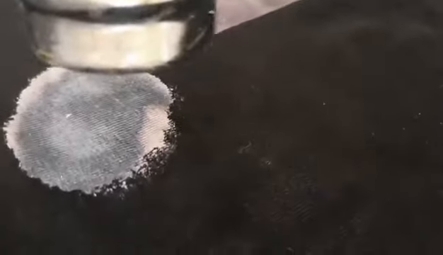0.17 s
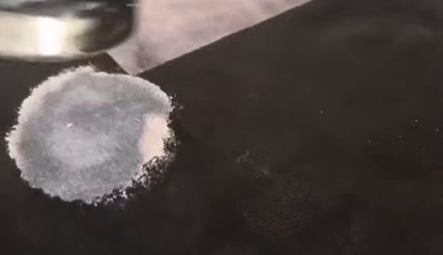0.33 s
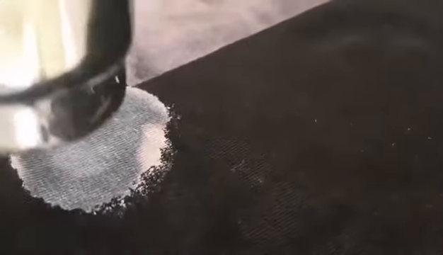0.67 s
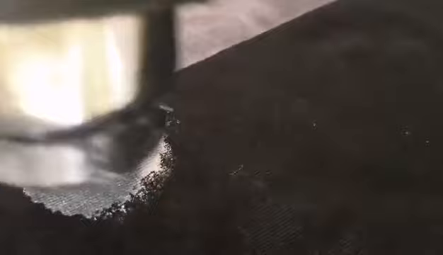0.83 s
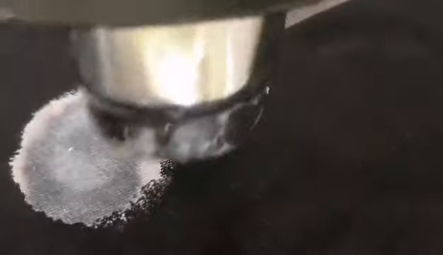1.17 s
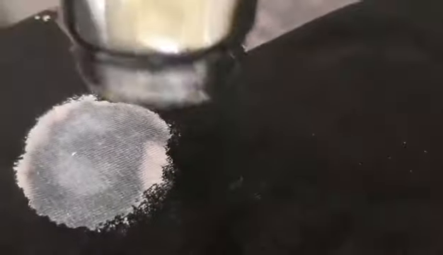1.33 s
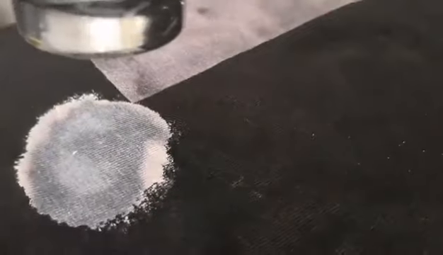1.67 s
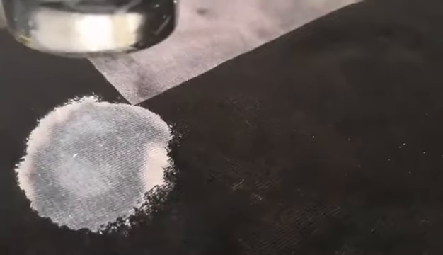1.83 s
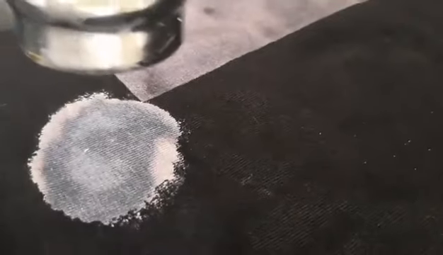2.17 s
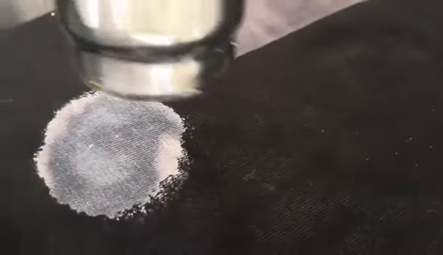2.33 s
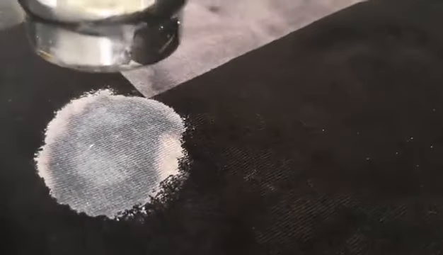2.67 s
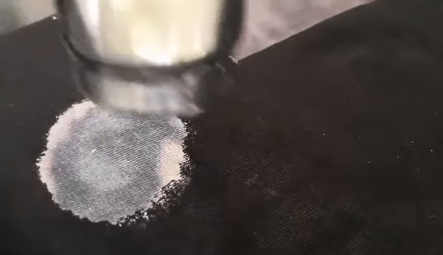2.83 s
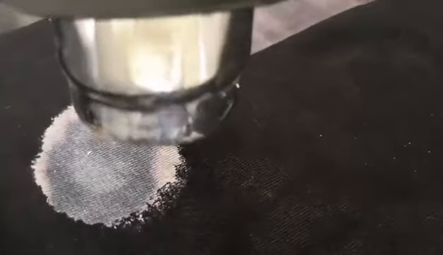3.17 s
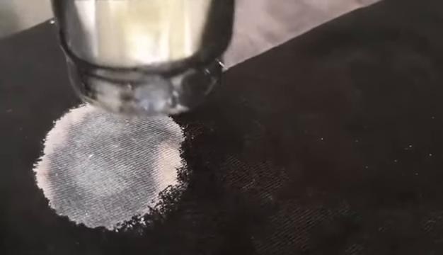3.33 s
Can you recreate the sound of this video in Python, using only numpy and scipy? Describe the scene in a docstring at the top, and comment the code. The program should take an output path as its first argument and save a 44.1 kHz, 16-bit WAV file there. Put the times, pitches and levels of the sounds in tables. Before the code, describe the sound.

A hot-air gun blows steadily close to the microphone, a high fan whine running through the rushing air. The rush shifts gently in colour as the gun sweeps over cloth, and a few soft gusts brush the microphone.

```python
"""A steady rush of air with a fan's whine in it: a hot-air gun, close to a two-port microphone.
A hand sweeps it over a patch on black cloth. The air rushes through the resonances of housing and
nozzle, its colour following the nozzle's position, and the work surface returns a faint reflection.
The fan whines on multiples of the shaft rate. Underneath lie a faint mains hum and the low rumble
of stray air, with short gusts where the jet brushes the microphone."""
import sys
import numpy as np
from scipy import signal
from scipy.fft import rfft, irfft
from scipy.io import wavfile
from scipy.ndimage import uniform_filter1d, map_coordinates

SR = 44100
rng = np.random.default_rng(int(sys.argv[2]) if len(sys.argv) > 2 else 0)


def wav_record(signal):
    """Record a signal, one row per channel, as 16-bit PCM in the file named by sys.argv[1]."""
    frames = np.transpose(np.atleast_2d(signal))
    bounded = np.clip(frames, -1, 1)
    # unit amplitude maps onto the largest positive 16-bit level
    quanta = np.round(bounded * 32767).astype(np.int16)
    wavfile.write(sys.argv[1], SR, quanta)


N = 154350  # 3.5 s

# Gusts of stray air on the microphone: peak_s, centre_hz, level_db
GUSTS = [(.75, 236, -46), (.81, 65, -55), (1.335, 74, -45.5), (1.645, 60.7, -57), (1.965, 50.3, -50),
         (2.045, 55.7, -58), (2.755, 54, -57), (3.474, 190, -42.5)]
# Motor speed: time_s, shaft_hz
SHAFT_SPEED = [(0, 274.8), (.62, 275.3), (1.15, 274.5), (1.36, 272.8), (1.8, 273.5), (2.42, 274.6),
               (3.1, 274.2), (3.5, 273.5)]
# Fan and motor tones at the microphone: shaft_multiple, left_db, right_db, left_lead_rad
FAN_TONES = [(1, -55.5, -56.5, -1.4), (4, -47.5, -55, 0.5), (5, -42, -45.5, -0.6), (6, -62, -56, -1),
             (12, -38.2, -39.7, -1.1), (20, -60, -60, 1.5)]
# The hand's path: time_s, sideways (about -1 left to 1 right), reach (about -1 back to 1 forward)
HAND_SWEEP = [(0.0, -0.61, 0.14), (0.25, -1.18, -1), (0.5, -1.27, 0.13), (0.75, -0.98, 0.53),
              (1.0, -0.099, 0.75), (1.25, 0.36, -0.72), (1.55, -0.18, -1.07), (1.9, -0.27, -1.26),
              (2.1, 0.52, 0.65), (2.4, 0.26, -0.99), (2.75, 0.0009, 0.55), (3.0, 0.13, 0.091),
              (3.25, 0.36, -0.045), (3.5, 0.69, 0.44)]
# Base spectrum of the rush at the two ports: freq_hz, left_db, right_db
RUSH_SPECTRUM = [(22.0, -79.1, -79.2), (237.0, -70.0, -70.1), (366.0, -71.2, -72.0), (495.0, -65.8, -68.3),
                 (690.0, -59.8, -66.3), (790.0, -61.0, -66.0), (875.0, -64.0, -64.8), (947.0, -57.4, -70.2),
                 (1012.0, -56.3, -68.6), (1098.0, -54.7, -62.6), (1184.0, -57.8, -69.8),
                 (1270.0, -59.0, -63.3), (1421.0, -60.1, -67.9), (1464.0, -57.4, -62.4),
                 (1507.0, -57.9, -67.3), (1593.0, -60.4, -68.0), (1723.0, -60.8, -63.2),
                 (1895.0, -53.0, -54.4), (2024.0, -56.5, -63.2), (2110.0, -53.8, -59.3),
                 (2283.0, -59.2, -58.7), (2670.0, -56.6, -59.6), (2756.0, -59.0, -58.3),
                 (2972.0, -59.7, -62.4), (3553.0, -63.0, -66.5), (3639.0, -59.8, -65.0),
                 (3941.0, -61.4, -64.0), (4199.0, -65.4, -74.8), (4414.0, -62.7, -79.9),
                 (4630.0, -64.0, -78.2), (4845.0, -67.9, -81.2), (5362.0, -68.1, -78.9),
                 (5685.0, -67.1, -74.7), (5986.0, -68.9, -74.8), (7429.0, -69.7, -73.0)]
# Narrow resonances of the housing: centre_hz, width_hz, lift_db
HOUSING_RESONANCES = [(738, 14, 8), (1272, 25, 1.5), (1467, 20, 1.5), (2005, 14, 2)]
# How alike the two ports hear the rush: freq_hz, coherence (0-1), left_lead_rad
PORT_LIKENESS = [(22.0, 0.97, -0.02), (215.0, 0.95, 0.07), (301.0, 0.5, 0.59), (452.0, 0.72, 2.45),
                 (754.0, 0.77, 2.6), (904.0, 0.48, 3.94), (1077.0, 0.68, 2.96), (1163.0, 0.49, 4.01),
                 (1206.0, 0.23, 7.3), (1270.0, 0.64, 8.53), (1464.0, 0.24, 9.23), (1550.0, 0.27, 8.13),
                 (1740, 0.75, 9.25), (1850, 0.97, 9.42), (1930, 0.92, 9.45), (2030, 0.6, 9.5),
                 (2200, 0.95, 9.42), (2340, 0.96, 9.45), (2541.0, 0.51, 10.47), (2713.0, 0.64, 10.36),
                 (2885.0, 0.51, 12.05), (3768.0, 0.66, 12.89), (4113.0, 0.29, 15.21), (4242.0, 0.18, 13.91),
                 (7429.0, 0.1, 13.99)]
# Colour change per unit of hand travel:
# centre_hz, left_sideways_db, right_sideways_db, left_reach_db, right_reach_db
NOZZLE_BEAM = [(150.0, -0.8, -0.9, 0.3, 0.5), (700.0, -1.0, -1.1, 0.5, -0.0),
               (1100.0, -1.3, -0.4, 0.2, -0.4), (1500.0, -2.7, 1.5, 0.2, 0.7),
               (1850.0, -2.7, 2.7, 0.2, -0.5), (2200.0, -1.9, 1.8, 0.8, 0.5),
               (2550.0, -0.0, 0.9, 1.6, -0.1), (3000.0, -1.5, 0.3, 1.6, -0.2),
               (3400.0, -1.0, -0.9, 0.6, 1.1), (3750.0, -0.1, -2.8, 0.8, -0.8),
               (4150.0, 0.5, -2.6, -0.8, -1.8), (4550.0, -0.1, -0.5, -1.9, -0.0),
               (5200.0, -0.9, 1.5, 1.2, 0.6), (5800.0, -1.3, 1.8, 2.5, 0.8), (6500.0, -0.9, -1.1, 2.6, 0.9),
               (7300.0, -1.2, -1.9, 0.1, 0.9)]
# Bands heard in opposite phase at the ports: centre_hz, width_hz, depth (0-1), depth_per_sideways
PHASE_HOLLOWS = [(1840, 190, .75, .9), (2060, 230, .1, .5), (2280, 210, .8, .7), (4060, 200, .2, -.4)]


def undb(db):
    """Decibels to gain."""
    return 10 ** (np.asarray(db) / 20)


def over_time(table):
    """The value columns of a (time_s, ...) table at every sample."""
    times, *columns = np.array(table, float).T
    return [np.interp(np.arange(N) / SR, times, column) for column in columns]


def over_frequency(table, hz):
    """The value columns of a (freq_hz, ...) table, joined on a log-frequency axis."""
    freqs, *columns = np.array(table, float).T
    log_hz = np.log(np.maximum(hz, 1))
    return np.array([np.interp(log_hz, np.log(np.sort(freqs)), column) for column in columns])


def wander(per_s):
    """Random levels, per_s of them a second, smoothed twice; spread 1."""
    hold = max(int(SR / per_s), 2)
    steps = np.repeat(rng.standard_normal(N)[:N // hold + 1], hold)
    smooth = uniform_filter1d(uniform_filter1d(steps, hold), hold)[:N]
    return smooth / smooth.std()


def rumble(low_hz, high_hz):
    """Noise in one band, rms 1."""
    bandpass = signal.butter(2, [low_hz, high_hz], "band", fs=SR, output="sos")
    noise = signal.sosfilt(bandpass, rng.standard_normal(N))
    return noise / noise.std()


def mains_hum(pitch_hz=100, level_db=-62.5):
    """A faint, steady mains tone, the same at both ports."""
    return np.sqrt(2) * undb(level_db) * np.sin(2 * np.pi * pitch_hz * np.arange(N) / SR)


def stray_air(level_db=-73.5, swing_db=1.5, gust_width_s=0.018):
    """Stray air rumbles unevenly right on the microphone, with short gusts as the jet swings about."""
    out = rumble(low_hz=9.2, high_hz=111) * undb(level_db + swing_db * wander(per_s=13))
    for peak_s, centre_hz, gust_db in GUSTS:
        swell = np.exp(-.5 * ((np.arange(N) / SR - peak_s) / gust_width_s) ** 2)
        out = out + undb(gust_db) * swell * rumble(centre_hz / np.sqrt(2), centre_hz * np.sqrt(2))
    return out


def fan_whine(speed_jitter=0.00018, waver_db=1.5):
    """Shaft and blade tones ride a slightly unsteady speed and waver in the turbulent air."""
    shaft_hz = over_time(SHAFT_SPEED)[0] * (1 + speed_jitter * wander(per_s=60))
    angle = 2 * np.pi * np.cumsum(shaft_hz) / SR
    out = 0
    for multiple, left_db, right_db, left_lead_rad in FAN_TONES:
        left = undb(left_db) * np.sin(multiple * angle)
        right = undb(right_db) * np.sin(multiple * angle - left_lead_rad)
        out = out + np.array([left, right]) * undb(waver_db * wander(per_s=22))
    return np.sqrt(2) * out  # the levels are rms


def surface_echo(rush, gain_db=-24.5, rest_lag_s=0.003, sideways_s=0.00047, reach_s=0.00036):
    """The work surface mirrors the tool; the lag follows the hand, so the rush phases gently."""
    sideways, reach = over_time(HAND_SWEEP)
    lag_s = rest_lag_s + sideways_s * sideways - reach_s * reach
    delayed = np.arange(N) - lag_s * SR
    return undb(gain_db) * np.array([map_coordinates(port, [delayed], order=1, mode="mirror")
                                     for port in rush])


def phase_hollows(rush, flicker=0.42, drift_hz=25, per_s=32):
    """Restless narrow dips in what the ports share give a phasey colour that follows the nozzle."""
    common, out = rush.mean(axis=0), rush
    sideways, _ = over_time(HAND_SWEEP)
    for centre_hz, width_hz, rest_depth, per_sideways in PHASE_HOLLOWS:
        depth = np.clip(rest_depth + per_sideways * sideways + flicker * wander(per_s), 0, 1)
        # shift the drifting band down to 0 Hz, isolate it, shift it back and subtract it
        carrier = np.exp(2j * np.pi * np.cumsum(centre_hz + drift_hz * wander(per_s)) / SR)
        lowpass = signal.butter(3, width_hz / 2, fs=SR, output="sos")
        band = signal.sosfiltfilt(lowpass, common / carrier, padtype=None)
        out = out - depth * 2 * (band * carrier).real
    return out


def turbulence(hz, band_hz=180, groups=7, flutter_db=1.72):
    """Spectra of two unrelated white noises whose narrow bands flutter in interleaved groups."""
    white = rfft(rng.standard_normal((2, N))) * np.sqrt(SR / 2)  # 0 dB per Hz
    out = 0
    for group in range(groups):
        in_group = hz // band_hz % groups == group
        out = out + irfft(white * in_group, N) * undb(flutter_db * wander(per_s=16))
    return rfft(out)


def nozzle_sweep(spectra, hz, port_swing_s=0.000022):
    """Each band of the rush swells or fades at each port as the hand moves the nozzle."""
    sideways, reach = over_time(HAND_SWEEP)
    beam = np.array(NOZZLE_BEAM)
    bands = over_frequency(np.column_stack([beam[:, 0], np.eye(len(beam))]), hz)  # overlapping triangles
    out = 0
    for band, sideways_db, reach_db in zip(bands, beam[:, 1:3], beam[:, 3:5]):
        gain_db = np.outer(sideways_db, sideways) + np.outer(reach_db, reach)
        out = out + irfft(spectra * band, N) * undb(gain_db)
    # the right port hears the rush earlier as the nozzle moves right
    advanced = np.arange(N) + port_swing_s * sideways * SR
    return np.array([out[0], map_coordinates(out[1], [advanced], order=3, mode="mirror")])


def air_rush(trim_db=-0.24):
    """Turbulence coloured by housing and nozzle, heard close up and only partly alike at the two ports."""
    hz = np.arange(N // 2 + 1) * SR / N
    left, unrelated = turbulence(hz)
    coherence, left_lead_rad = over_frequency(PORT_LIKENESS, hz)
    right = (coherence * left + np.sqrt(1 - coherence ** 2) * unrelated) * np.exp(-1j * left_lead_rad)
    housing_db = sum(lift_db / (1 + (2 * (hz - centre_hz) / width_hz) ** 2)
                     for centre_hz, width_hz, lift_db in HOUSING_RESONANCES)
    colour = undb(over_frequency(RUSH_SPECTRUM, hz) + housing_db + trim_db)
    return nozzle_sweep(np.array([left, right]) * colour, hz)


def scene():
    """At the microphone: the rush and its reflection in front, fan, stray air and hum beneath."""
    rush = air_rush()
    return phase_hollows(rush + surface_echo(rush)) + fan_whine() + stray_air() + mains_hum()


def record(dry):
    """The recorder cuts the top steeply."""
    cutoff_hz = 7490
    return signal.sosfilt(signal.ellip(18, .1, 90, cutoff_hz, fs=SR, output="sos"), dry)


dry = scene()
out = record(dry)
wav_record(out)
```